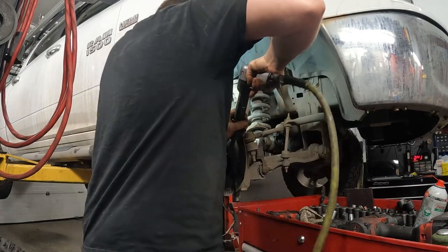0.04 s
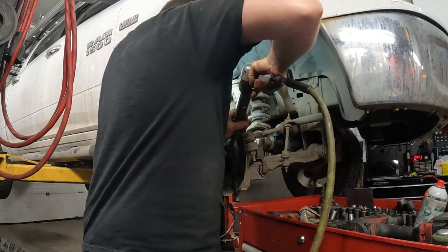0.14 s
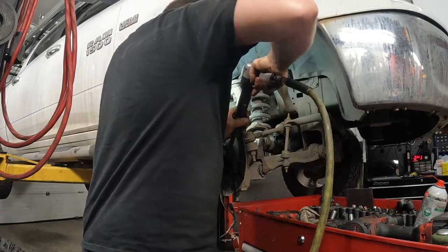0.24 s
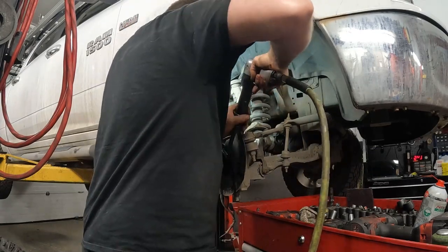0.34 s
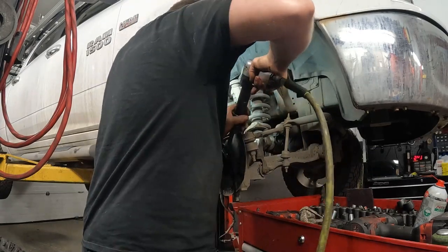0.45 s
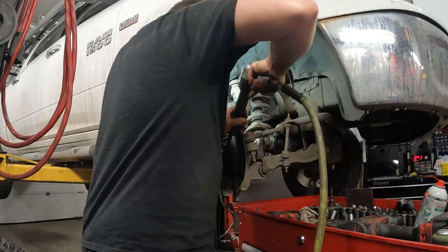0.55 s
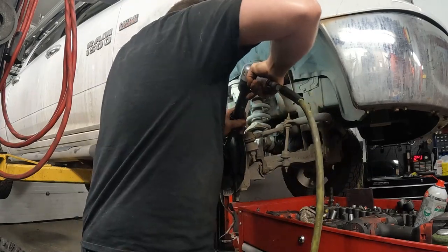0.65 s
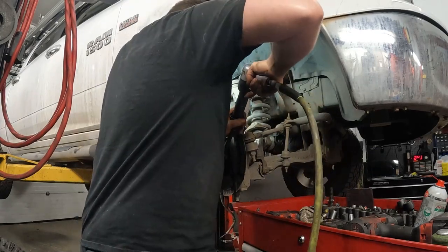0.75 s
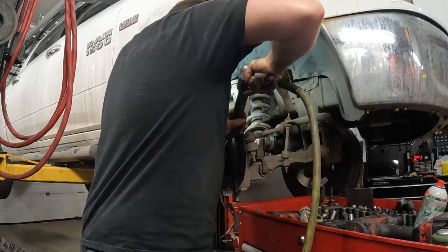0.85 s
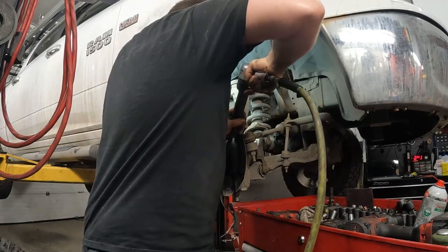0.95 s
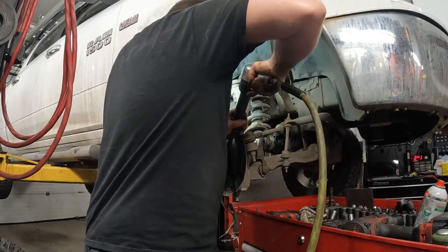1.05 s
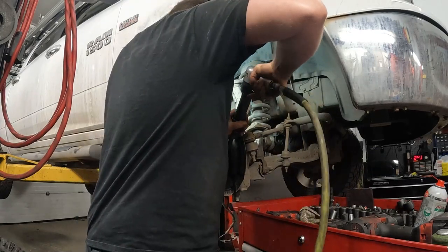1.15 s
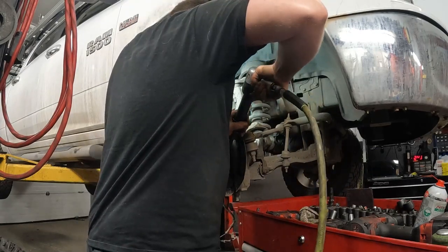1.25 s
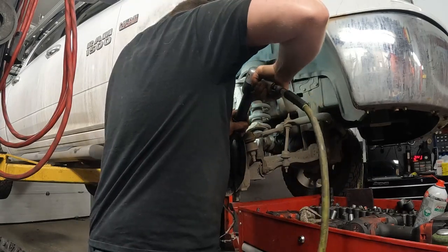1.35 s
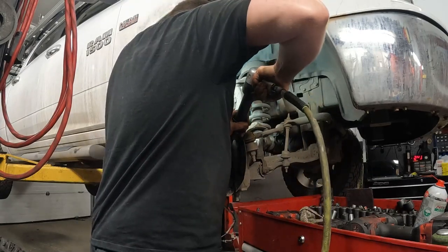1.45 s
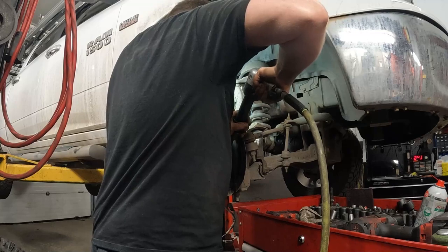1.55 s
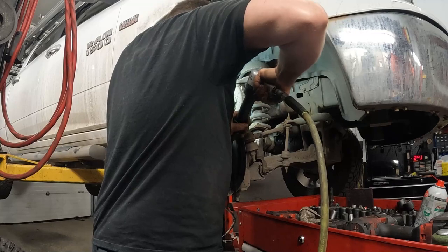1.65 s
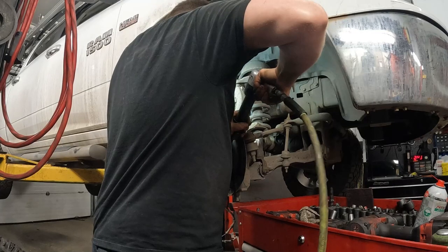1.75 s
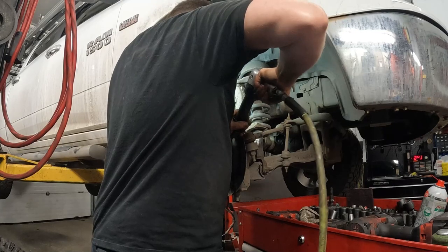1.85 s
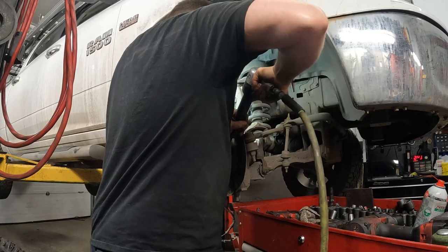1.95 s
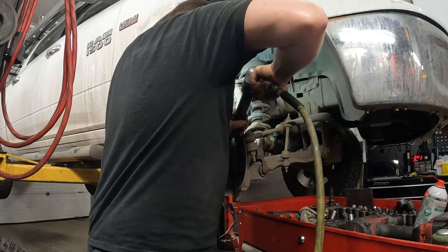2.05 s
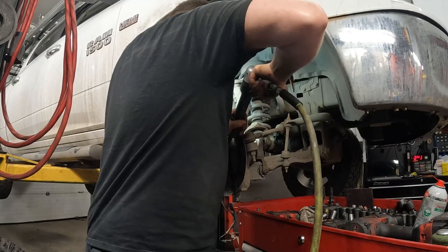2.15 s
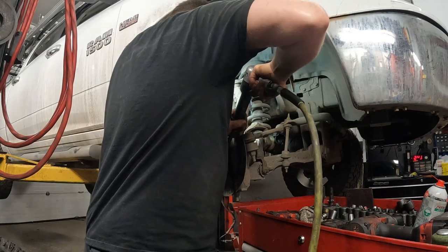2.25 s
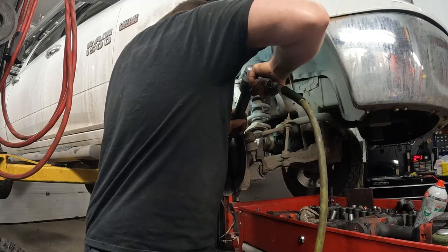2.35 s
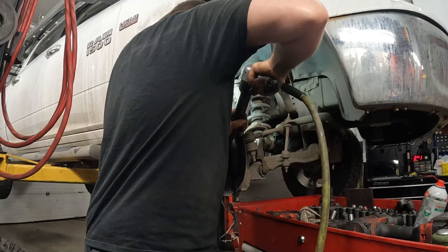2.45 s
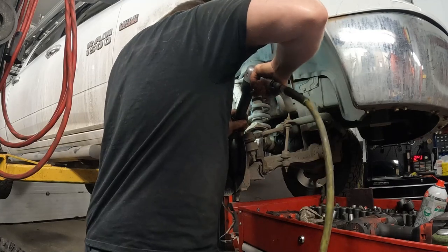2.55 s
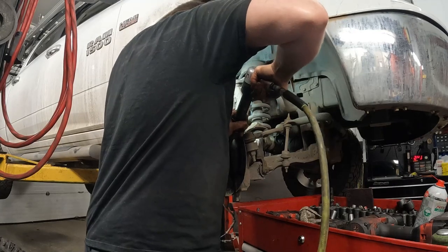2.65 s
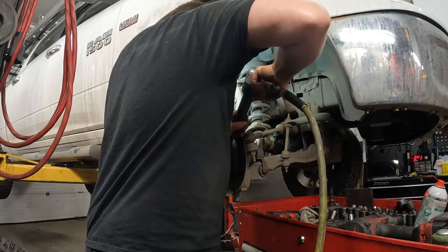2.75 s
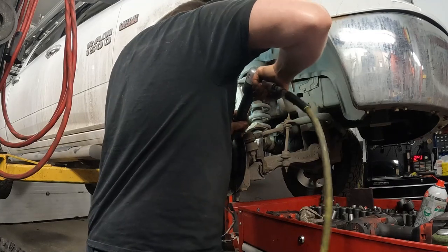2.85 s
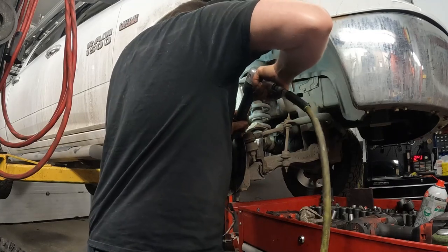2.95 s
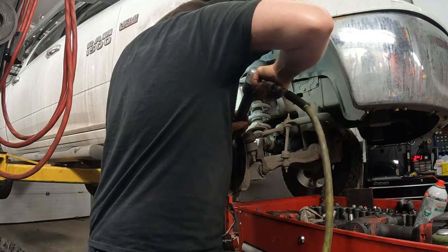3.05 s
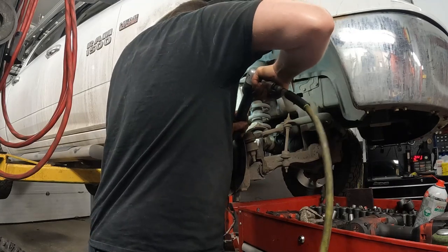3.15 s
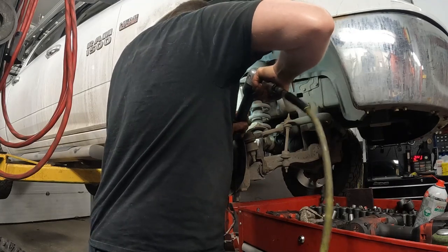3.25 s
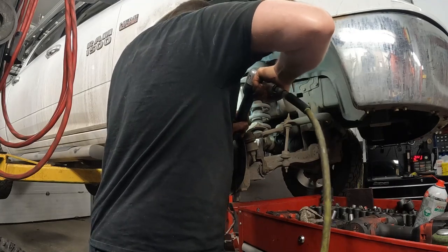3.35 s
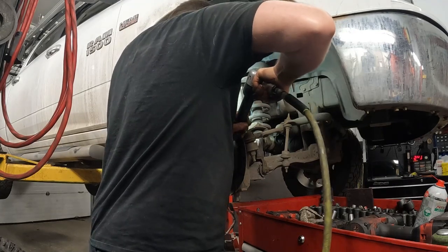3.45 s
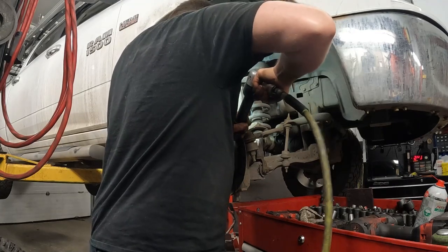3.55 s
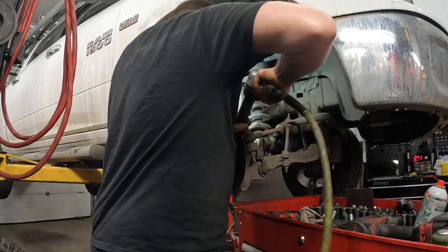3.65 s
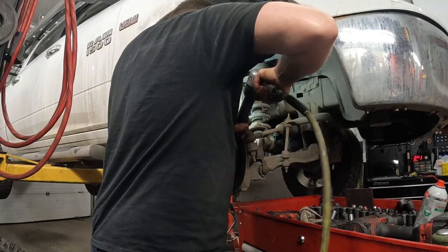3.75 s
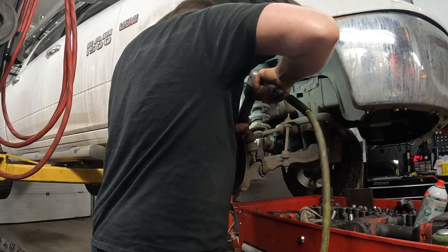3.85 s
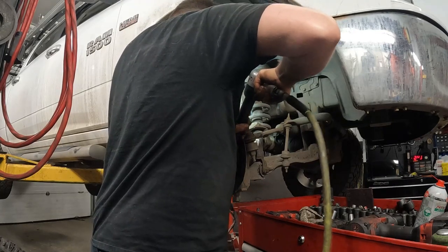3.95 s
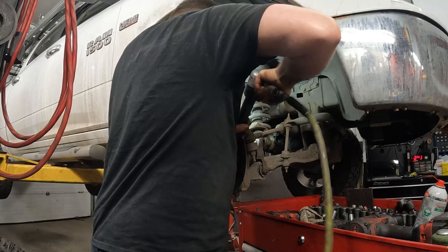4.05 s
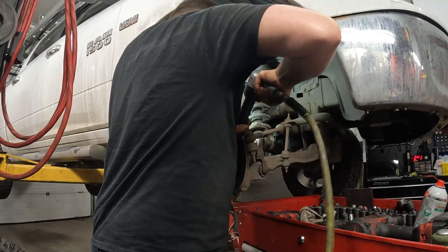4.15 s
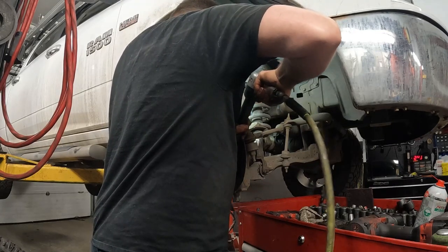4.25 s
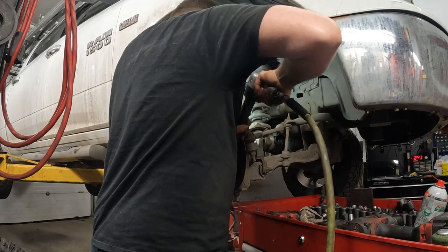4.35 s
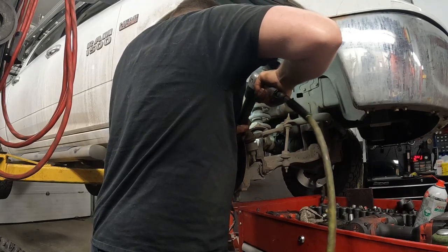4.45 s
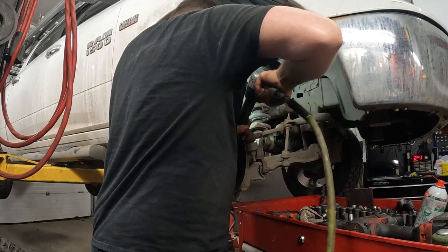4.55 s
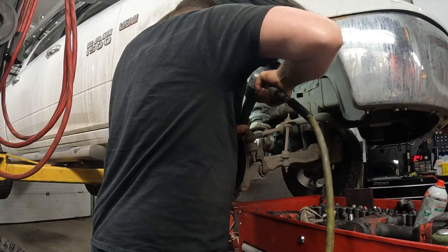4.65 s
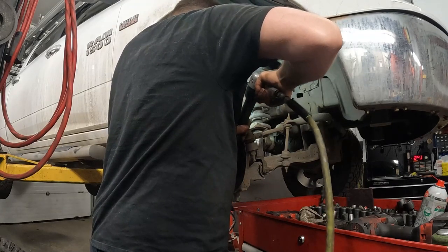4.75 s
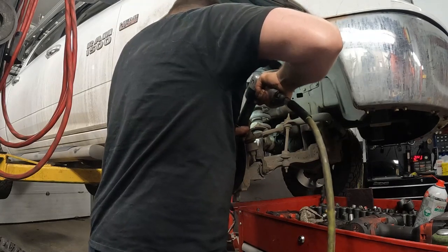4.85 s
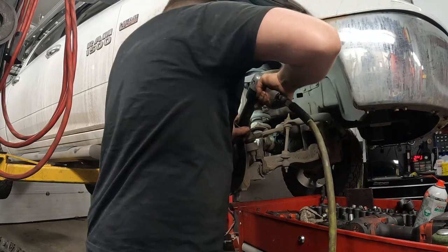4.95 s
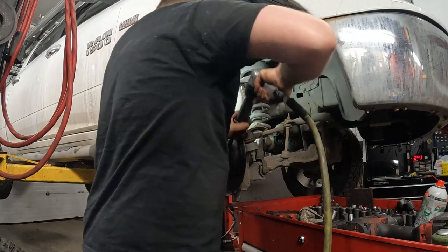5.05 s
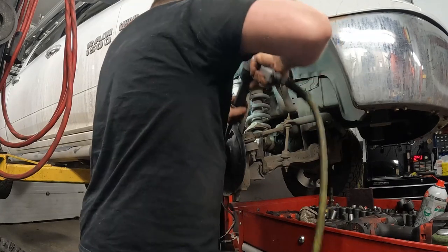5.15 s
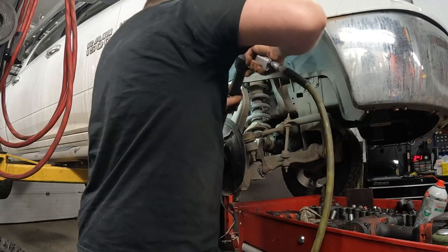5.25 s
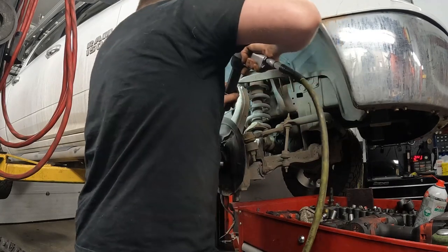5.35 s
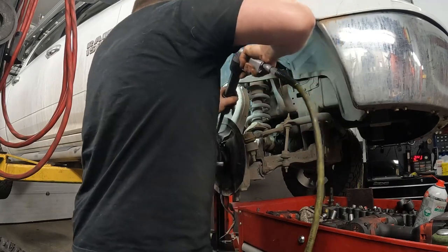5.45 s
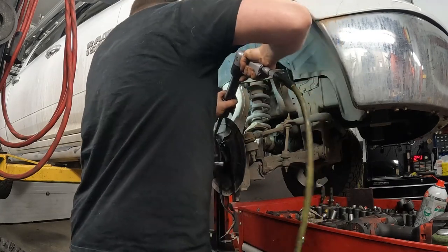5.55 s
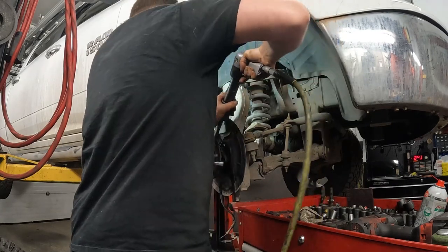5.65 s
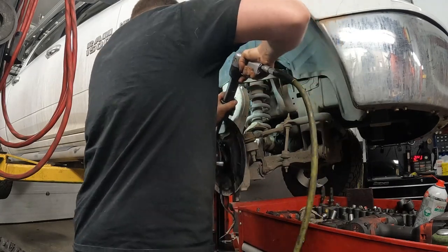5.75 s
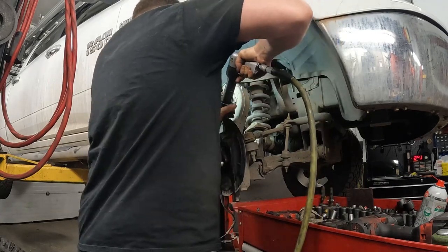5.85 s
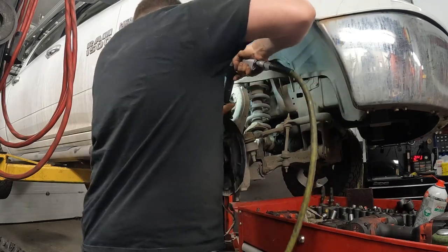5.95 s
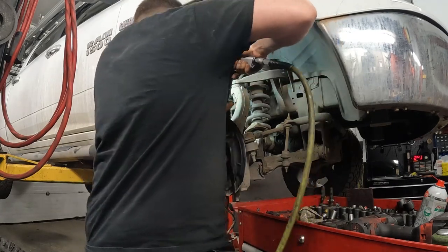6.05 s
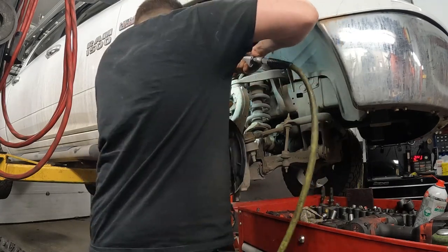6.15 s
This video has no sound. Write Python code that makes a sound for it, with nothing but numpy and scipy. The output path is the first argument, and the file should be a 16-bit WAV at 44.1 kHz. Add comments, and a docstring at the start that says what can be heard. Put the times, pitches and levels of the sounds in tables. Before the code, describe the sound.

In a hard, echoing workshop with a deep machine drone, a steel tool clanks, ticks and scrapes against loose brake parts, with a short low groan. After a quiet pause, air hisses and a pneumatic hammer hits about a dozen times, pauses briefly, then hammers faster for two seconds. The air dies away and a few bright clanks follow. Close stereo microphone.

```python
"""Ticks, scrapes, clanks and groans as a tool is set on a seized wheel hub, over a machine's rumble.
Then spent air hisses and an air hammer pounds in two runs; the air dies off and the tool clanks again.
Blows excite filtered-noise rings of chisel and hub, sine notes and suspension modes; air is coloured noise.
Clanks, ticks and slides excite resonant filters; bumps and groans are decaying or gliding sines.
A hard-walled workshop adds echoes, and two microphone ports hear the sum."""
import sys
import numpy as np
from scipy import signal
from scipy.fft import rfft, irfft, next_fast_len
from scipy.io import wavfile
from scipy.ndimage import uniform_filter1d

SR = 44100
rng = np.random.default_rng(int(sys.argv[2]) if len(sys.argv) > 2 else 0)


def store_pcm(level_fs):
    """Save levels as 16-bit WAV."""
    pcm = np.round(np.clip(level_fs, -1, 1) * 32767).astype(np.int16)
    wavfile.write(sys.argv[1], SR, np.atleast_2d(pcm).T)


N = 273420

# Spectrum of a clank or scrape. Each row: frequency in Hz, relative level in dB.
CLANK_SPECTRUM = [(20, -74), (150, -41), (400, -30.5), (600, -18), (1000, 3.5), (1600, 3.5), (2050, 2),
                  (2450, -9.5), (3300, -23), (4500, -19.5), (8000, -42), (10000, -82.5)]
# Resonances of the loose brake parts. Each row: frequency in Hz, width in Hz, height in dB.
BRAKE_MODES = [(585, 33, 7.5), (965, 70, 12.2), (1084, 46, 7.4), (1350, 22, 8.7), (1564, 14, 12.6),
               (1793, 25, 11), (1890, 19, 14.6), (2780, 40, 6), (3100, 50, 17)]
# Spectrum of a light tick or bright contact. Each row: frequency in Hz, relative level in dB.
TICK_SPECTRUM = [(20, -44.5), (400, 7.5), (2200, 10), (3200, 6), (4300, 1), (5200, 4), (7400, 3.5),
                 (9000, -20.5), (12200, -20), (14500, -46)]
TRIGGER_S = 1.7825  # the trigger starts to open


def undb(db):
    """Decibels to gain."""
    return 10 ** (np.asarray(db) / 20)


def unit(x):
    """Scale to rms 1."""
    return x / np.sqrt(np.mean(x ** 2))


def fade(t, t60):
    """Exponential decay by 60 dB in t60 seconds."""
    return np.exp(-np.log(1000) * t / t60)


def add(track, start_s, sound):
    """Mix a sound into the track at start_s."""
    start = max(int(start_s * SR), 0)
    track[start:start + len(sound)] += sound[:N - start]


def across(hz, rows, axis=1):
    """Interpolate a table column on a log-frequency axis."""
    rows = np.array(rows)
    return np.interp(np.log(hz + 1), np.log(rows[:, 0]), rows[:, axis])


def colour(x, spectrum, peaks=()):
    """Minimum-phase (causal) filter: a broad spectrum with resonances standing on it."""
    size = 2 * next_fast_len(len(x))
    hz = np.arange(size // 2 + 1) * SR / size
    power = 1
    for peak_hz, width_hz, peak_db in peaks:
        power = power + (undb(peak_db) ** 2 - 1) / (1 + (2 * (hz - peak_hz) / width_hz) ** 2)
    magnitude = undb(across(hz, spectrum)) * np.sqrt(np.maximum(power, 0.5))
    cepstrum = irfft(np.log(magnitude))
    # fold the cepstrum onto positive time
    cepstrum[1:size // 2] *= 2
    cepstrum[size // 2 + 1:] = 0
    return irfft(rfft(x, size) * np.exp(rfft(cepstrum)))[:len(x)]


def even(x, width_hz=60):
    """Flatten the broad spectrum of a random response so it adds no colour of its own."""
    spectrum = rfft(x)
    width_bins = max(int(width_hz * len(x) / SR), 1)
    power = uniform_filter1d(np.abs(spectrum) ** 2, width_bins)
    return irfft(spectrum / np.sqrt(power), len(x))


def strike(push, spectrum, peaks=()):
    """Ring of a body after a push, scaled to rms 1 over the first 10 ms."""
    ring = colour(push, spectrum, peaks)
    return ring / np.sqrt(np.mean(ring[:SR // 100] ** 2))


def burst(t, t60):
    """Short, dense rattle of contact: decaying noise."""
    return rng.standard_normal(len(t)) * fade(t, t60)


def waver(rate_per_s):
    """Smooth random wobble about 0, rms near 1."""
    t = np.arange(N) / SR
    return 1.2 * np.interp(t * rate_per_s, np.arange(N), rng.standard_normal(N))


def blows():
    """Piston strikes as rows of (s, blow dB, suspension shake dB); a dying jolt opens each run."""
    # Strikes, slower on light throttle. Each row: time in seconds, strength in dB re a steady blow.
    strikes = [(1.8685, 3.5), (1.9296, 1.5), (1.9876, 0.5), (2.044, 0), (2.108, -0.5), (2.1776, 0),
               (2.2624, 0.5), (2.3472, -1), (2.428, 0), (2.5135, 0), (2.597, -.5), (2.6814, -.5),
               (2.8634, 1.5), (2.9206, 2), (2.9741, -1), (3.0291, -1.5), (3.0875, -0.5), (3.1459, -0.5),
               (3.203, 0), (3.2606, -1), (3.3157, 0.5), (3.3707, -0.5), (3.4258, 0), (3.4842, 0.5),
               (3.5434, 0.5), (3.602, 0), (3.6584, 0), (3.7109, 0), (3.7669, 0), (3.8204, 1), (3.8748, 0),
               (3.9274, -0.5), (3.984, -0.5), (4.0377, .5), (4.0892, -0.5), (4.1427, 0), (4.196, -1.5),
               (4.2479, -0.5), (4.3019, -1), (4.3579, 0), (4.4104, -.5), (4.4625, -0.5), (4.5167, 0),
               (4.5689, -.5), (4.6228, -0.5), (4.675, 0), (4.7297, 0), (4.7849, -0.5), (4.8386, -1),
               (4.8911, 0), (4.9462, -1.5), (5.0131, -1)]
    # Runs of blows. Each row: start in seconds, extra shake in dB.
    runs = [(1.86, 8.5), (2.86, 3)]
    steady_blow_db, steady_shake_db, jolt_s = -16.5, -27, 0.28
    times, strength_db = np.transpose(strikes)
    jolt_db = sum(db * (times >= s) * np.exp(-((times - s) / jolt_s) ** 2) for s, db in runs)
    return np.c_[times, steady_blow_db + strength_db, steady_shake_db + jolt_db]


def bouncing_contact(t, bounces=4, spacing_s=0.0016, t60=0.012, loss_db=2.5):
    """The chisel bounces on the hub, each contact weaker than the last."""
    shape = np.zeros(len(t))
    for k in range(bounces):
        lag_s = k * spacing_s
        shape += undb(-k * loss_db) * (t >= lag_s) * fade(np.maximum(t - lag_s, 0), t60)
    return shape


def rattling_ring(t, swell_s=0.00032, hold_s=0.017, hold_t60=0.4, t60=0.022):
    """The chisel rattles on the hub, then the ring dies; a rebound snaps back on the retainer."""
    rebound_s, rebound_db, rebound_t60 = 0.0057, 6, 0.009
    held = fade(np.minimum(t, hold_s), hold_t60)
    dying = fade(np.maximum(t - hold_s, 0), t60)
    rebound = (t >= rebound_s) * fade(np.maximum(t - rebound_s, 0), rebound_t60)
    return dying * held * (1 - np.exp(-t / swell_s)) + undb(rebound_db) * rebound


def hammer(ring_db=-10.0, crack_db=-8, creep_rad_per_s=1.0, chatter=0.17):
    """Blows crack in quick bounces and wake dense steel modes that change slowly as the tip creeps."""
    # Dense ringing of chisel and hub. Each row: frequency in Hz, relative level in dB.
    steel = [(20, -47), (200, -13.5), (450, -9), (620, -4), (950, -4.5), (1200, -2), (1400, -6), (2050, -3),
             (2550, -7), (3900, -12.5), (5000, -2.5), (6300, -2), (7600, -7), (9000, -20.5), (12200, -19.5),
             (13600, -35.5), (15500, -59)]
    # First contact. Each row: frequency in Hz, relative level in dB.
    crack = [(20, -53), (150, -23.5), (450, -10), (700, 4), (1300, 0.5), (2100, 3.5), (2600, -6),
             (4000, -6), (5100, -3.5), (7600, -5), (9000, -43.5), (12200, -31), (15000, -58.5)]
    t = np.arange(SR // 4) / SR
    out = np.zeros(N)
    layers = ((rattling_ring(t), steel, ring_db), (bouncing_contact(t), crack, crack_db))
    for shape, spectrum, gain_db in layers:
        # six tip seatings: it creeps between the first two, the others are random chatter
        noises = rng.standard_normal((6, len(t)))
        pushes = [even(noise * shape, width_hz=110) * (t < t[-1] / 2) for noise in noises]
        rings = np.array([strike(push, spectrum) for push in pushes])
        for s, blow_db, _ in blows():
            angle = creep_rad_per_s * s
            others = chatter * rng.standard_normal(len(rings) - 2)
            shares = np.r_[np.cos(angle), np.sin(angle), others]
            add(out, s, undb(blow_db + gain_db) * (shares @ rings) / np.linalg.norm(shares))
    return out


def hub(detune=0.0025):
    """Each blow wakes clear notes of hub and chisel, slightly detuned as the contact changes."""
    # Each row: frequency in Hz, level in dB re the blow, swell in seconds, t60 in seconds.
    notes = [(575, -25, .002, .08), (616, -21.5, 0.0022, 0.147), (923, -15.5, .002, .12),
             (993, -13.5, 0.0016, .12), (1024, -18.5, 0.0018, .09), (1174, -21, 0.0014, 0.12),
             (1587, -22, .001, .17), (1797, -23, .001, .06), (2054, -21, .001, .11),
             (2930, -14, 0.0027, 0.034), (3134, -19, .002, .06), (4327, -19, 0.0023, .11),
             (4900, -15.5, .003, 0.079), (5104, -5, 0.0041, 0.029), (5238, -5.5, 0.0022, 0.03),
             (5370, -19, 0.0056, .08), (5740, -22, 0.0046, .05), (6157, -8.5, 0.0058, 0.038),
             (6235, -7, 0.0076, .04), (6486, -12, .008, 0.039)]
    t = np.arange(SR // 6) / SR
    hz, note_db, swell_s, t60 = np.transpose(notes)[:, :, None]
    swell = 1 - np.exp(-(t / swell_s) ** 2)
    envelopes = undb(note_db) * swell * fade(np.maximum(t - swell_s, 0), t60)
    signs = (-1) ** np.arange(len(notes))  # neighbouring modes swing against each other
    out = np.zeros(N)
    for s, blow_db, _ in blows():
        pitch_hz = hz * (1 + detune * rng.standard_normal(hz.shape))
        tones = envelopes * np.sin(2 * np.pi * pitch_hz * t)
        add(out, s, undb(blow_db) * (signs @ tones))
    return out


def chassis(return_s=0.042, return_db=-5, knock_db=-13, scatter_db=1.3):
    """Blows shake the suspension; the returning piston kicks it again and loose parts knock."""
    # Suspension and body panels. Each row: frequency in Hz, level in dB, t60 in seconds.
    panels = [(35.98, -2.5, 1), (51, -18.5, 0.086), (74, -7, 0.22), (98, -4, 0.17), (119.3, -3.5, 0.17),
              (172.3, -8, 0.18), (186.4, -3, 0.24), (207.8, -3, 0.21), (250.4, -8.5, 0.25),
              (279.5, -10, 0.26)]
    t = np.arange(SR // 2) / SR
    hz, mode_db, t60 = np.transpose(panels)
    modes = np.sin(2 * np.pi * hz[:, None] * t) * fade(t, t60[:, None])
    signs = (-1) ** (np.arange(len(hz)) // 2)  # some panels swing against the others
    out = np.zeros(N)
    for s, _, shake_db in blows():
        knock_s = 2 * return_s * rng.random()
        for lag_s, kick_db in ((0, 0), (return_s, return_db), (knock_s, knock_db)):
            weights = signs * undb(mode_db + scatter_db * rng.standard_normal(len(hz)))
            add(out, s + lag_s, undb(shake_db + kick_db) * (weights @ modes))
    return out


def airflow(t):
    """Gain of the air through the trigger: eased in, surging when pulled home, steady, let go."""
    full_open_s, release_s = 1.850, 5.138
    steady_db, eased_db, surge_db = -36, -8, 9  # the last two relative to steady
    open_s, surge_s, close_t60 = 0.002, 0.04, 0.46
    surge = surge_db * np.exp(-np.maximum(t - full_open_s, 0) / surge_s)
    flow_db = steady_db + np.where(t < full_open_s, eased_db, surge)
    opening = 1 - np.exp(-np.maximum(t - TRIGGER_S, 0) / open_s)
    return undb(flow_db) * opening * fade(np.maximum(t - release_s, 0), close_t60)


def exhaust(puff_db=5, puff_s=0.009):
    """Spent air hisses while the trigger is held, with a puff as each stroke uncovers the port."""
    # Each row: frequency in Hz, relative level in dB.
    air_spectrum = [(20, -56), (150, 5.5), (600, -1.5), (1000, -1.5), (2000, 0.5), (3500, -10), (5500, -15),
                    (7500, -12.5), (9000, -36), (12200, -35.5), (15000, -41)]
    t = np.arange(N) / SR
    strokes = np.r_[-1, blows()[:, 0]]
    since_s = t - strokes[np.searchsorted(strokes, t, side="right") - 1]
    puffing = 1 + undb(puff_db) * np.exp(-(since_s / puff_s) ** 2)
    hiss = unit(colour(rng.standard_normal(N), air_spectrum))
    return hiss * airflow(t) * puffing


def valve(level_db=-40.5, rise_s=0.0015, close_s=1.875, close_t60=0.19, spit_per_s=160, spit_db=1.5):
    """Air sputters through the half-open trigger valve until the full flow silences it."""
    # Each row: frequency in Hz, relative level in dB.
    valve_spectrum = [(20, -53), (500, -11), (1300, 8), (2000, 6.5), (3200, 1.5), (4300, -3.5),
                      (6500, -0.5), (8500, -13), (10000, -11.5), (11800, -4), (14500, -26)]
    t = np.arange(N) / SR
    opening = 1 - np.exp(-np.maximum(t - TRIGGER_S, 0) / rise_s)
    gate = opening * fade(np.maximum(t - close_s, 0), close_t60)
    hiss = unit(colour(rng.standard_normal(N), valve_spectrum))
    return hiss * gate * undb(level_db + spit_db * waver(spit_per_s))


def clanks(clank_t60=0.07, contact_t60=0.11, body_t60=0.1, spot_width_hz=150, spot_db=11.5):
    """Tool knocks ring the brake parts, strongest at the struck spot, with bright contact and low body."""
    # Each row: start in seconds, clank level in dB, bright contact level in dB, low body level in dB,
    # pitch favoured by the struck spot in Hz.
    knocks = [(.132, -42, -60, -39, 1000), (.143, -43, -52, -35, 958), (.220, -28, -43, -34.5, 1960),
              (.238, -42, -52, -37, 1690), (.331, -37, -62, -41, 1870), (.378, -38.5, -60, -40, 1900),
              (0.542, -43, -72, -51, 1800), (.584, -46, -54, -60, 1620), (.652, -44.5, -55, -42.5, 1350),
              (.727, -56, -44, -30.5, 985), (1.843, -45, -41, -26, 900), (5.597, -30, -33.5, -47, 1600),
              (5.610, -29, -35.5, -45, 1630), (5.722, -34, -49, -46, 920), (5.736, -39, -62, -52, 1810),
              (5.749, -38, -61, -45, 1500), (5.815, -48, -73, -63, 1840), (5.962, -39.5, -66, -54, 1760),
              (5.975, -39.5, -74, -51.5, 1190)]
    # Each row: frequency in Hz, relative level in dB.
    body_spectrum = [(20, -55), (70, -18), (130, -5), (220, 0.5), (400, -7), (600, 1.5), (850, 2),
                     (1400, -7.5), (2500, -22.5), (6000, -46)]
    t = np.arange(SR // 3) / SR
    out = np.zeros(N)
    for s, *levels_db, spot_hz in knocks:
        spot = [(spot_hz, spot_width_hz, spot_db)]
        parts = [(clank_t60, CLANK_SPECTRUM, BRAKE_MODES + spot),
                 (contact_t60, TICK_SPECTRUM, ()),
                 (body_t60, body_spectrum, BRAKE_MODES)]
        for db, (t60, spectrum, peaks) in zip(levels_db, parts):
            push = even(burst(t, t60), width_hz=150) * (t < t[-1] / 2)
            add(out, s, undb(db) * strike(push, spectrum, peaks))
    return out


def ticks(t60=0.1, width_share=0.13, ring_db=7.5):
    """Light touches of chisel and hose coupling: noise bursts with one broad resonance."""
    # Each row: start in seconds, level in dB before the rise, rise in seconds, ring in Hz.
    touches = [(0.061, -44, 0.011, 1870), (0.088, -43.5, 0.0077, 1000), (.45, -49.5, 0.0081, 1900),
               (0.559, -49.5, 0.0048, 1900), (.693, -33, 0.0056, 940), (0.962, -41.5, 0.026, 944),
               (1.058, -43.5, 0.0042, 2240), (1.378, -59, 0.0012, 7500)]
    t = np.arange(SR // 3) / SR
    out = np.zeros(N)
    for s, db, rise_s, ring_hz in touches:
        tick = strike(burst(t, t60), TICK_SPECTRUM, [(ring_hz, width_share * ring_hz, ring_db)])
        add(out, s, undb(db) * tick * (1 - np.exp(-t / rise_s)))
    return out


def scrape(slips_per_s=1500, spread_db=1.0, grab_per_s=55, grab_db=3.0):
    """The chisel slides on rusty steel: small slips excite the brake parts as the tip grabs and frees."""
    # Each row: loudest moment in seconds, level in dB, rise in seconds, fall in seconds.
    slides = [(.15, -40, 0.042, 0.055), (.36, -43, 0.13, 0.067), (.62, -51.5, 0.046, 0.082),
              (.76, -48, 0.026, 0.027)]
    t = np.arange(N) / SR
    pressure = np.zeros(N)
    for s, db, rise_s, fall_s in slides:
        pressure += undb(db) * np.exp(-np.maximum((s - t) / rise_s, (t - s) / fall_s))
    slips = (rng.random(N) < slips_per_s / SR) * rng.standard_normal(N)
    slips = slips * undb(spread_db * rng.standard_normal(N))
    grabbed = slips * undb(grab_db * waver(grab_per_s))
    return unit(colour(grabbed, CLANK_SPECTRUM, BRAKE_MODES)) * pressure


def drags(wobble_share=0.035, wobble_per_s=90, judder_db=2.5):
    """Heavy, unsteady rubbing makes the wheel arch groan in short tones that slide in pitch."""
    # Each row: loudest moment in seconds, level in dB, half length in seconds, pitch in Hz,
    # glide in Hz per second.
    groans = [(.772, -33.5, 0.026, 211.2, -150), (0.837, -42.5, 0.02, 248, -49.5),
              (0.881, -47.5, 0.074, 292, -60.5), (1.0, -41.5, .022, 316, 200),
              (.998, -45.5, .022, 401, -100), (1.071, -47.5, 0.038, 337, -350),
              (1.165, -57, 0.032, 400, 99), (1.193, -54, .022, 319, 48)]
    t = np.arange(N) / SR
    out = np.zeros(N)
    for s, db, half_s, hz, glide_hz_per_s in groans:
        pitch_hz = (hz + glide_hz_per_s * (t - s)) * (1 + wobble_share * waver(wobble_per_s))
        tone = np.sqrt(2) * np.sin(2 * np.pi * np.cumsum(pitch_hz) / SR)
        out += undb(db) * tone * np.exp(-((t - s) / half_s) ** 2)
    return out * undb(judder_db * waver(wobble_per_s))


def bumps(rise_s=0.00068, judder_hz=60, judder=0.5, reach_octaves=0.52):
    """Soft contacts swing the wheel arch's modes, most near each bump's centre; they judder as they die."""
    # The tool seats and the piston starts. Each row: start in seconds, level in dB, ring centre in Hz.
    contacts = [(.733, -28.5, 239), (.80, -33.5, 290), (0.985, -32.5, 44), (1.844, -22, 235),
                (1.913, -21, 198)]
    # Wheel arch modes. Each row: frequency in Hz, level in dB, t60 in seconds.
    arch = [(43.8, 1.5, 0.32), (109.4, 4.5, 0.4), (193, -7, 0.075), (215, -5, 0.24), (248.6, -5, 0.16),
            (288, -3, .2), (317.5, -4.5, 0.26), (353, -6.5, 0.19), (412, -6.5, 0.36), (440, -5, 0.24)]
    t = np.arange(SR) / SR
    out = np.zeros(N)
    for s, db, centre_hz in contacts:
        for hz, mode_db, t60 in arch:
            octaves = np.log2(hz / centre_hz)
            weight = undb(db + mode_db) / (1 + (octaves / reach_octaves) ** 2)
            wobble = np.interp(t * judder_hz, np.arange(len(t)), rng.standard_normal(len(t)))
            swing = np.sin(2 * np.pi * (hz * t + rng.random()))
            envelope = fade(t, t60) * (1 - np.exp(-t / rise_s))
            add(out, s, weight * (1 + judder * wobble) * swing * envelope)
    return out


def shop(level_db=-41, drone_hz=36, width_hz=7, drone_db=8, side_db=-6):
    """A machine drones deep and unevenly under faint air noise; only the hiss differs between the ears."""
    # Each row: frequency in Hz, relative level in dB.
    shop_spectrum = [(12, -33), (22, -6), (49, -4), (66, -13.5), (92, -10), (115, -26), (164, -27),
                     (470, -46), (1000, -45.5), (2100, -51), (3600, -58.5), (6500, -52.5), (7600, -60),
                     (8700, -68.5), (10500, -64.5), (15000, -84)]
    mid = unit(colour(rng.standard_normal(N), shop_spectrum, [(drone_hz, width_hz, drone_db)]))
    hiss = unit(colour(rng.standard_normal(N), shop_spectrum))
    treble = signal.sosfilt(signal.butter(2, 2000, "high", fs=SR, output="sos"), hiss)
    return undb(level_db) * (mid + undb(side_db) * treble * np.array([[1], [-1]]))


def workshop(build_s=0.044, gap_s=0.0056, end_s=1.3):
    """Stereo room response: noise echoes thicken, then decay at a rate set by frequency."""
    # Each row: frequency in Hz, t60 in seconds.
    room_t60 = [(60, 0.89), (250, 0.65), (1000, 0.98), (3000, 0.71), (5000, 0.64), (7000, 0.38),
                (11000, 0.28)]
    # Echo width. Each row: frequency in Hz, side minus mid in dB.
    room_side = [(100, -30), (500, -23), (1300, -19), (2600, -8), (5000, -14), (9000, -8), (13000, -6)]
    t = np.arange(SR * 3 // 2) / SR
    hz = np.arange(len(t) // 2 + 1) * SR / len(t)
    noise = rfft(rng.standard_normal((2, len(t))))
    centres_hz, t60s = np.transpose(room_t60)
    tail = 0
    for share, t60 in zip(np.eye(len(centres_hz)), t60s):
        band = across(hz, np.c_[centres_hz, share])
        tail = tail + irfft(noise * band) * fade(t, t60)
    onset = 1 - np.exp(-np.maximum(t - gap_s, 0) / build_s)
    window = (t > gap_s) * (t < end_s)
    mid, side = (even(x * onset, width_hz=25) * window for x in tail)
    side = irfft(rfft(side) * undb(across(hz, room_side)))
    return np.array([mid + side, mid - side])


def echoes(sent, sway_rad_per_s=1.6):
    """Echoes glide between two room responses as the mechanic sways beside the hub."""
    angle = sway_rad_per_s * np.arange(N) / SR
    out = 0
    for share in (np.cos(angle), np.sin(angle)):
        out = out + signal.fftconvolve((sent * share)[None], workshop(), axes=1)[:, :N]
    return out


def scene(hammer_wet_db=-1.0, hub_wet_db=-3, chassis_wet_db=-8, air_wet_db=-3,
          handling_wet_db=-7.0, bump_wet_db=-7):
    """Every source is heard directly and through the room; the shop noise is added dry."""
    sources = [(hammer(), hammer_wet_db),
               (hub(), hub_wet_db),
               (chassis(), chassis_wet_db),
               (exhaust() + valve(), air_wet_db),
               (clanks() + ticks() + scrape(), handling_wet_db),
               (bumps() + drags(), bump_wet_db)]
    direct = sum(x for x, _ in sources)
    sent = sum(x * undb(wet_db) for x, wet_db in sources)
    return direct + echoes(sent) + shop()


def record(dry, ceiling=0.65, top_hz=15600):
    """Two ports differ in level and phase; the loudest peaks are rounded and the top is cut."""
    # Microphone ports. Each row: frequency in Hz, left minus right in dB, left lead in radians.
    port_table = [(224, 0.5, 0), (700, 3.5, 0.2), (1705, 3, 0.17), (2080, 2.5, -0.24), (2440, -1, -1.76),
                  (3000, 10.5, -0.5), (3770, 2.5, 1), (4550, 0, 0.39), (6400, -2, 0.22), (11000, 1.5, 0.26)]
    size = 2 * next_fast_len(N)
    hz = np.arange(size // 2 + 1) * SR / size
    half = np.array([[0.5], [-0.5]])  # split each difference between the ports
    phase = np.exp(1j * half * across(hz, port_table, axis=2))
    ports = undb(half * across(hz, port_table)) * phase
    heard = irfft(rfft(dry, size) * ports)[:, :N]
    heard = signal.sosfilt(signal.butter(2, 15, "high", fs=SR, output="sos"), heard)
    rounded = heard / (1 + (heard / ceiling) ** 4) ** 0.25
    return signal.sosfilt(signal.ellip(8, 0.2, 70, top_hz, fs=SR, output="sos"), rounded)


dry = scene()
out = record(dry)
store_pcm(out)
```